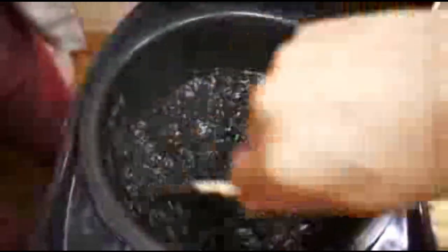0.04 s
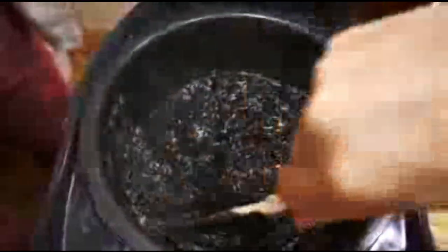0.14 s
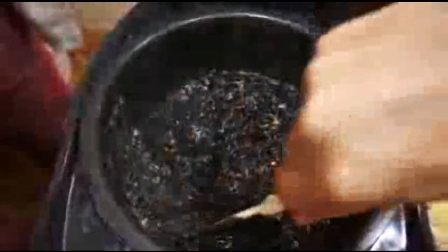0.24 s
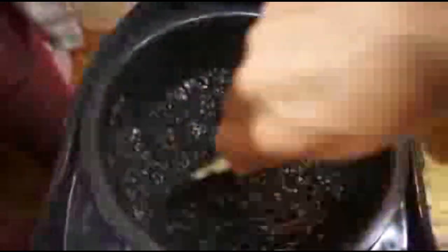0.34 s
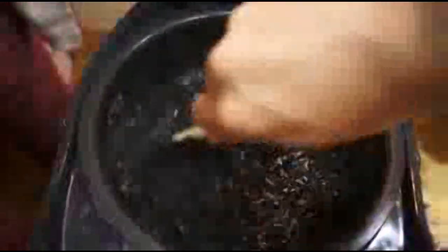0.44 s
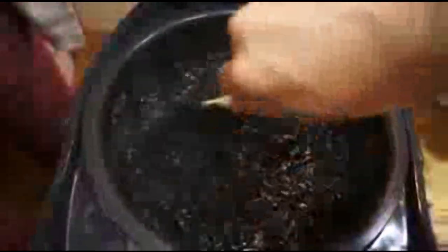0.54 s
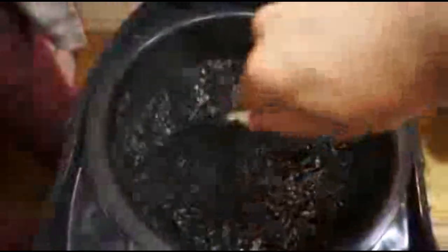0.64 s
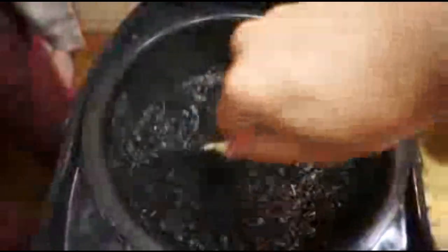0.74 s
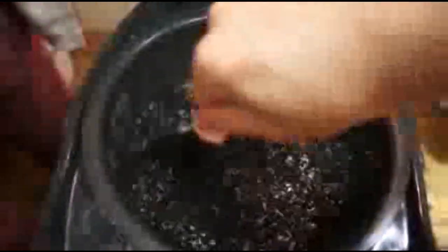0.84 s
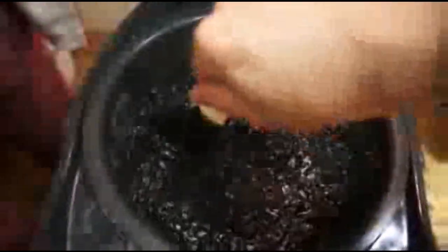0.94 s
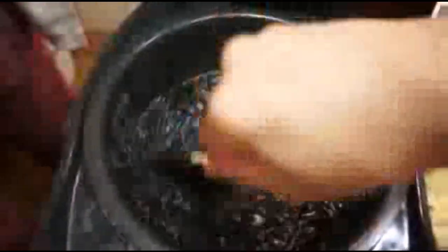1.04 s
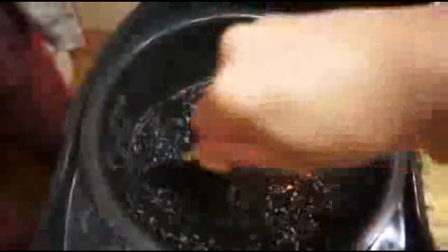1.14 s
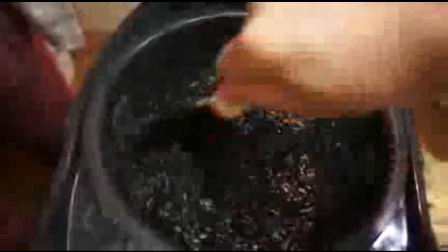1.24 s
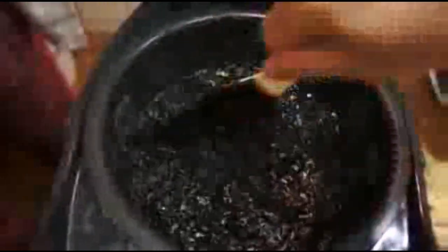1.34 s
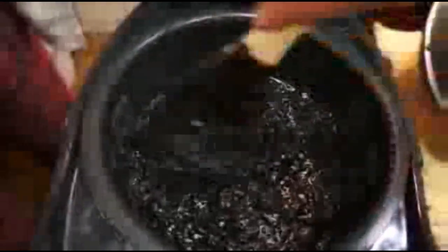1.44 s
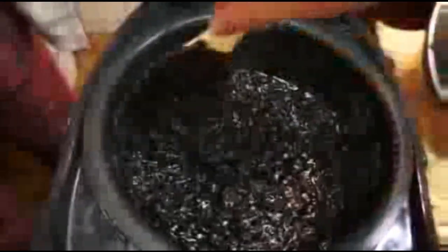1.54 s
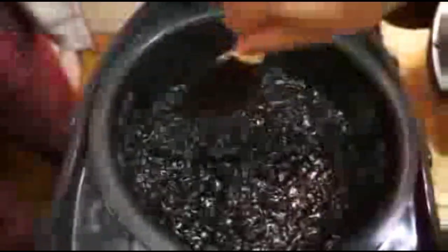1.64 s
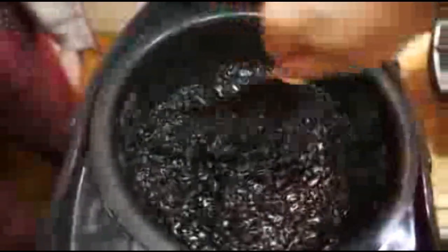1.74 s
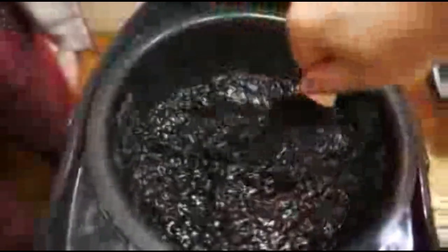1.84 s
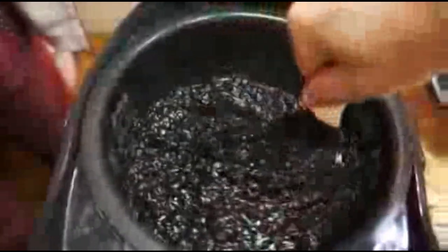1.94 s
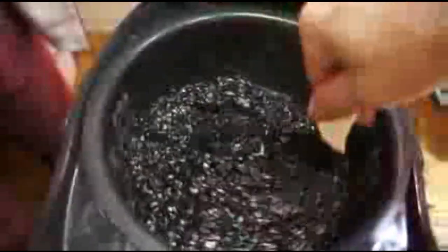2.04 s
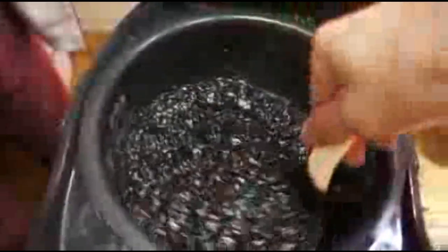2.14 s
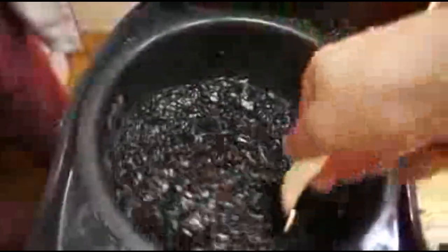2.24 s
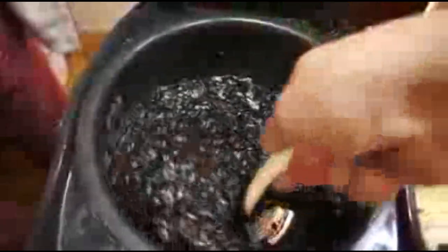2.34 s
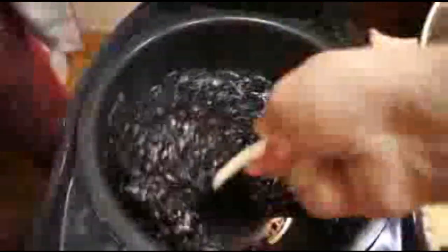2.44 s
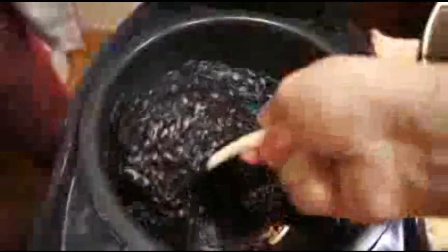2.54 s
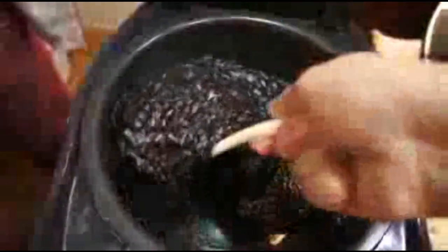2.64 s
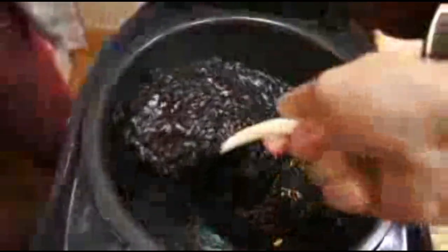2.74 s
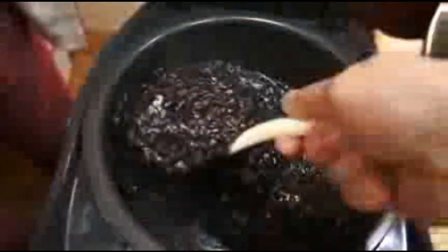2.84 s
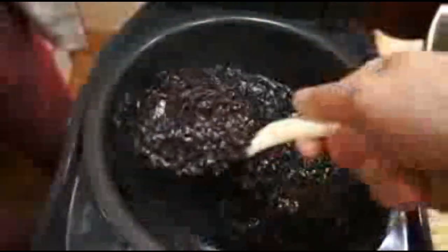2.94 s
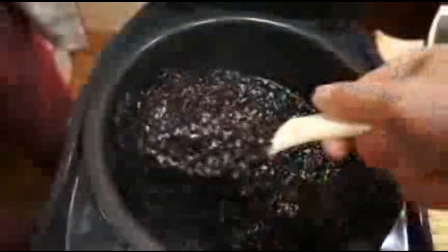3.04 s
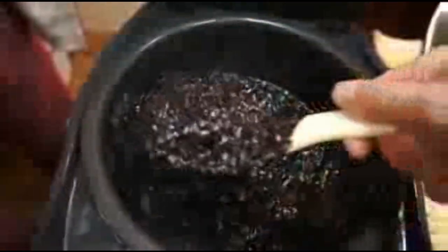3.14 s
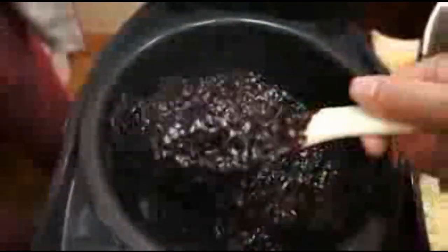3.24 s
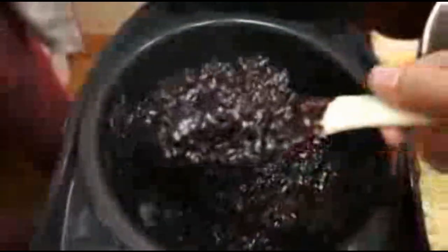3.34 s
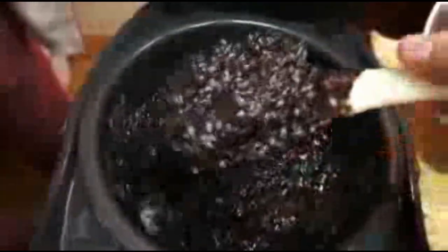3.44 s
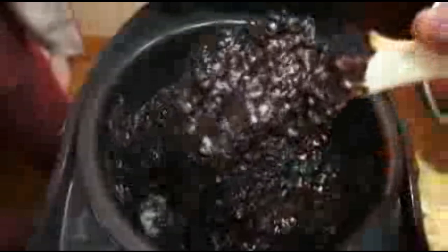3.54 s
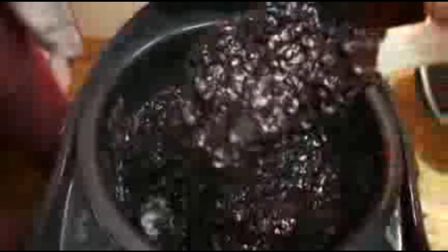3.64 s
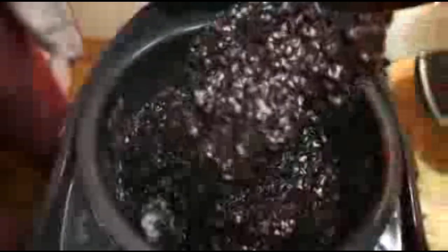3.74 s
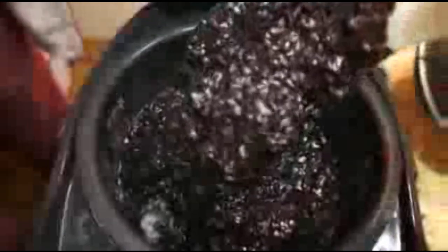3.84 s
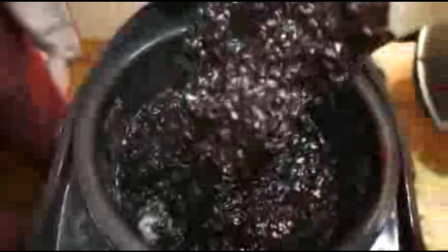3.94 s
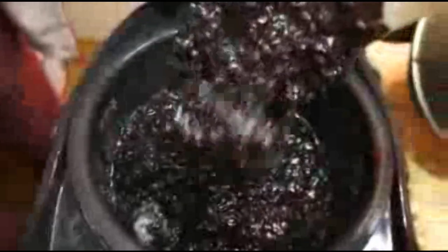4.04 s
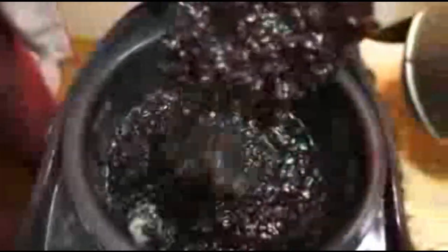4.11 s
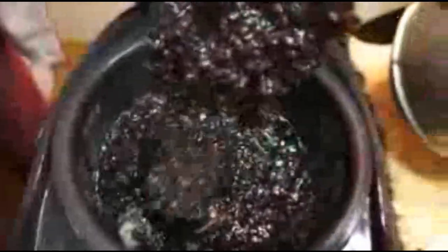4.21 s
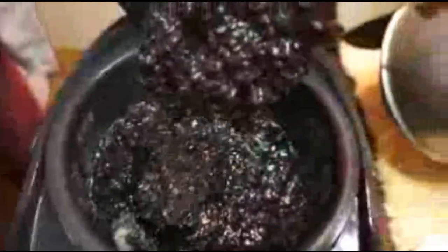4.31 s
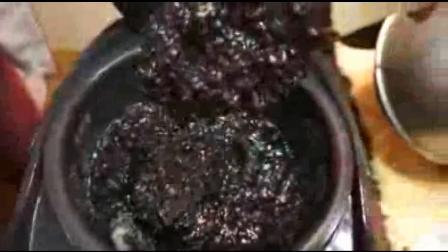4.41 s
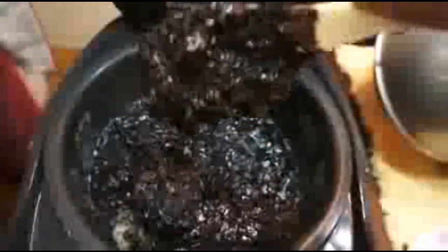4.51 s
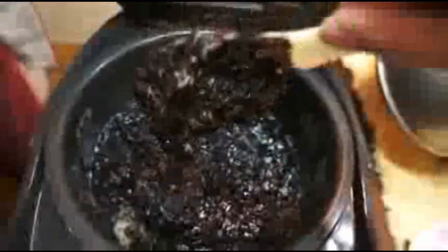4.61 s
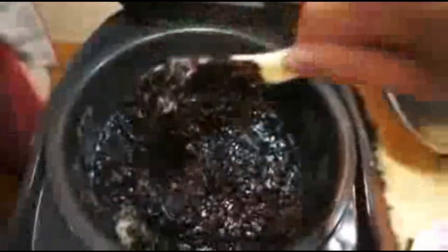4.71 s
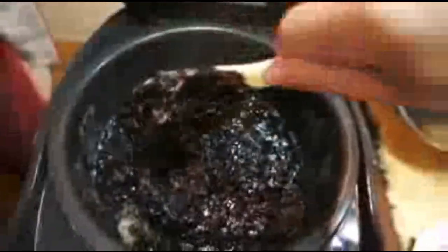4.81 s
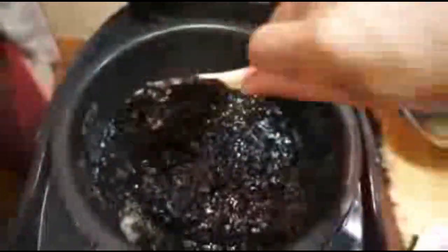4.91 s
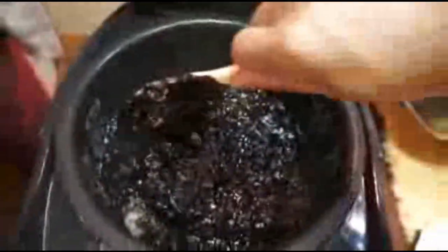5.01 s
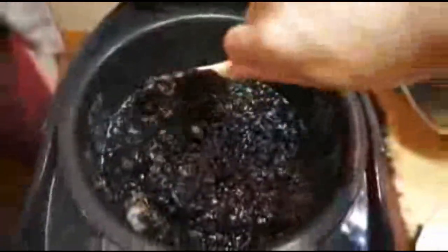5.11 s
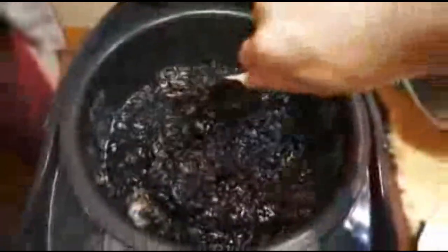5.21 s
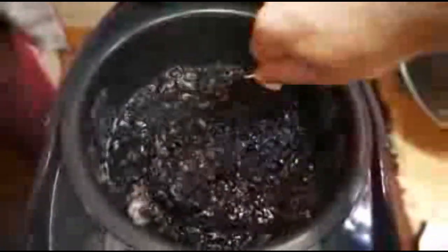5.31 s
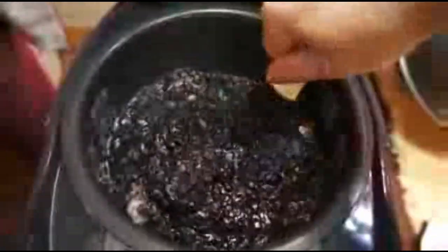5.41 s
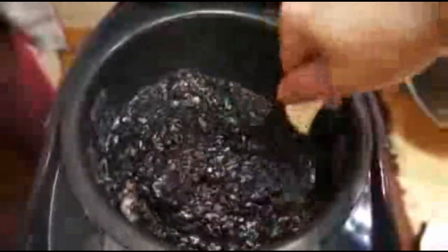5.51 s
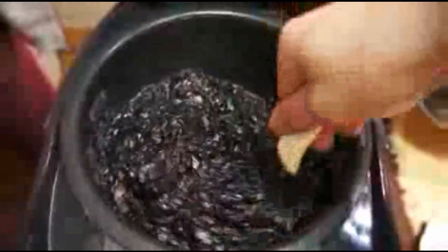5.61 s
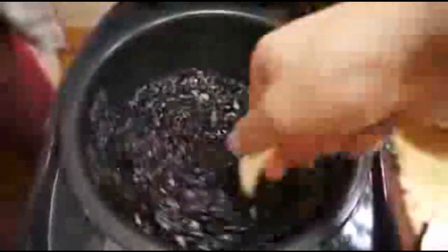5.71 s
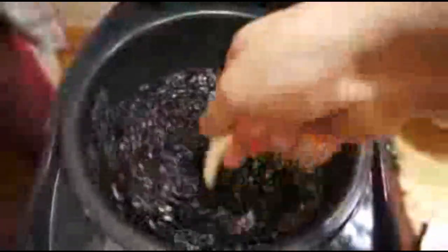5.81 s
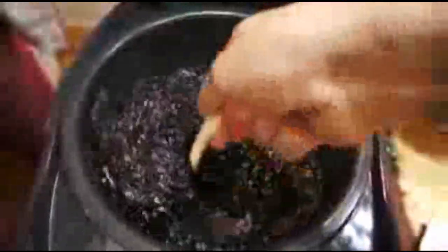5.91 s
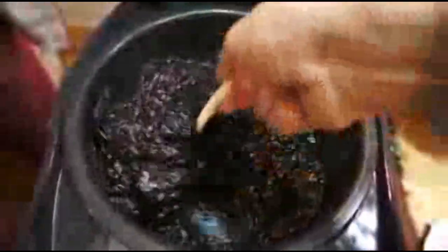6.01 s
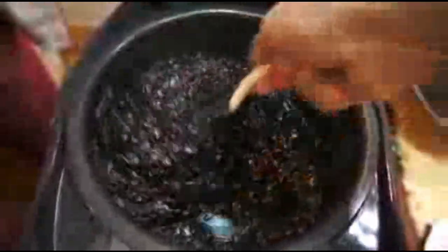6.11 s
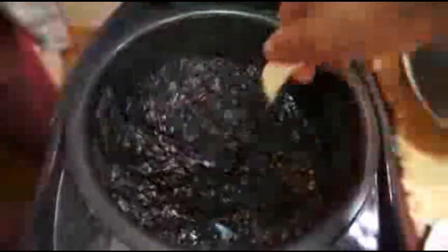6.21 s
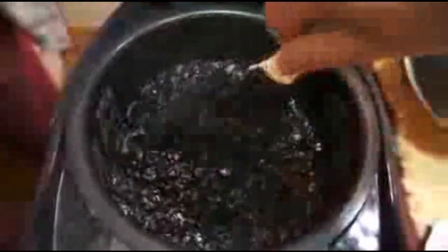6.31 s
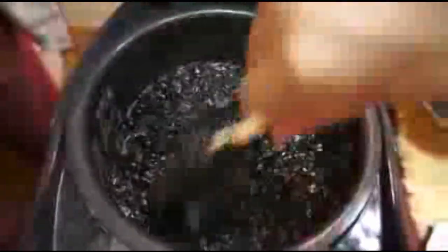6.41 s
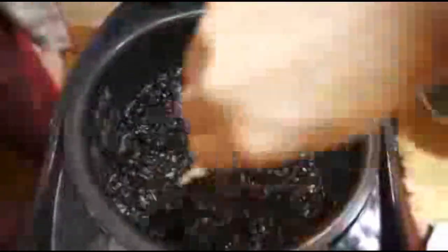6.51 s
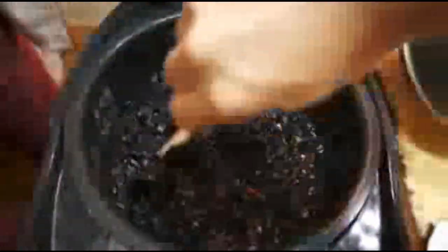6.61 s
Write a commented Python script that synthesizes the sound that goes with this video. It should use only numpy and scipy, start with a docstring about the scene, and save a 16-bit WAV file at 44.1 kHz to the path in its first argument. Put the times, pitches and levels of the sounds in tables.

```python
"""Sticky rice, paddle and pot

Kitchen, a small microphone close to a rice cooker; a plastic paddle turns sticky rice in its pot.
Knocks are brief pushes and crunches that ring blade and pot; rubs are uneven slips in one resonance.
Shaped noise bursts make the drag, the scraping and the wet crackle; snapping starch gives louder smacks.
Around the middle the pushes pause, leaving little but the room's hiss and a thin whine.
A small room's short reverberation follows the pot, and low shudders rock the cooker.
"""
import sys
import numpy as np
from scipy import signal
from scipy.fft import rfft, irfft, next_fast_len
from scipy.io import wavfile
from scipy.ndimage import uniform_filter1d, map_coordinates

SR = 44100
rng = np.random.default_rng(int(sys.argv[2]) if len(sys.argv) > 2 else 0)


def store_wav(level_fs):
    """Save 16-bit WAV to argv[1]."""
    pcm = np.round(np.clip(np.atleast_2d(level_fs), -1, 1) * 32767)
    wavfile.write(sys.argv[1], SR, pcm.T.astype(np.int16))


N = 293706

# Room hiss, relative colour: [f/Hz, level/dB]
HISS_COLOUR = [(25, -3.5), (70, -10.5), (160, -2.5), (350, -5.5), (620, -3.5), (1100, -9), (2500, -14.5),
               (5000, -17.5), (7500, -22), (15000, -13.5)]
HISS_DB = -65.5
# Pushes of the paddle through the rice, levels before the mix of layers:
# [start t/s, length/s, force level/dB, wetness/dB over force]
STROKES = [(-0.05, 0.055, -62.5, -0.5), (0.125, 0.09, -49, 0), (0.25, 0.16, -60, 3),
           (0.538, 0.13, -52, -2.5), (0.689, 0.07, -54.5, -5), (0.837, 0.071, -47.5, -12.5),
           (0.996, 0.077, -54.5, -4.5), (1.188, 0.033, -48.5, -21), (1.303, 0.23, -60.5, 3),
           (1.725, 0.22, -55.5, -4), (1.915, 0.13, -50, -14), (2.141, .2, -50.5, -10),
           (2.347, 0.24, -51.5, -13), (2.582, 0.34, -63.5, 6), (3.027, .42, -69, 2.5),
           (4.215, 0.17, -64.5, -2), (4.636, 0.043, -55.5, -9), (5.318, 0.048, -61.5, -1.5),
           (5.56, 0.2, -57.5, -0.5), (5.702, 0.21, -51.5, -3), (5.972, 0.26, -58.5, 0.5),
           (6.26, 0.071, -56, 1), (6.37, 0.16, -60, 0)]
STROKE_ATTACK_S = .035
DRAG_RELEASE_DB_PER_S, CRACKLE_RELEASE_DB_PER_S = 212, 146  # the grains go on parting after the blade stops
RESTING_DRAG_DB, RESTING_CRACKLE_DB = -70.5, -77.5  # rice settling between pushes, before the mix
# Rice dragged over the pot, relative colour: [f/Hz, level/dB]
DRAG_COLOUR = [(59, -25), (100, -14), (194, -9), (290, 4.5), (392, -2), (518, 5.5), (810, -2.5),
               (937, -2.5), (983, -6), (1430, -8), (1800, -44), (2340, -36), (3960, -120)]
# Edge of the paddle scraping, relative colour: [f/Hz, level/dB]
SCRAPE_COLOUR = [(600, -21), (1400, 4.5), (2200, -1.5), (3100, 3.5), (4200, -9), (6000, -23.5)]
# Wet grains parting, relative colour: [f/Hz, level/dB]
CRACKLE_COLOUR = [(2500, -35), (4200, -10), (5500, 3), (7200, 8.5), (15000, 2.5)]
# Paddle on pot: [t/s, contact time/s, blade note f/Hz, free ringing of the wall/dB, strength level/dB,
# brightness/dB per register, snap of crushed rice level/dB]
KNOCKS = [(0.1128, 0.0031, 2143, 2.5, -37, 7, -47), (0.362, 0.0019, 514, 0.5, -55.5, -4.5, -78),
          (0.43, 0.00073, 510, -0.5, -53, -5, -69), (0.4587, 0.00087, 543, -10, -41, -5, -51.5),
          (0.6108, 0.0021, 1525, -4, -46.5, 3.5, -38.5), (0.906, 0.002, 400, 1, -44.5, -2, -51.5),
          (0.989, 0.00072, 1417, -2.5, -37, 0, -59.5), (1.282, 0.00062, 761, -9, -40, -2, -58.5),
          (1.734, .0014, 1245, 1, -48, 8, -44.5), (1.911, .003, 1280, 0.5, -32.5, -6.5, -48.5),
          (2.179, 0.0012, 892, -2.5, -37, 2, -36.5), (2.298, .0016, 560, 4.5, -49, -4, -66),
          (2.563, 0.00078, 2180, -17, -55, 6, -72), (2.64, 0.0019, 1755, -3, -46.5, -0.5, -55),
          (5.405, .001, 1358, -2, -26.5, -6, -55), (5.441, 0.00058, 514, -4, -47.5, -7.5, -76),
          (5.776, 0.00098, 1650, 3, -48.5, 1, -78), (6.057, 0.0011, 1070, -6.5, -54.5, 0, -70),
          (6.2852, 0.0024, 2800, -1.5, -49.5, 0, -55), (6.617, 0.0037, 1530, -10, -45, 5, -39.5),
          (6.6261, 0.00095, 1134, 4, -32.5, 3.4, -39)]
# A blow of middling brightness, in its five registers: thump, thud, body, clack, ring [level/dB over strength]
KNOCK_REGISTERS_DB = [-26.5, -10, -1, -1, -12]
# Modes of the rice-filled pot, before each blow's detuning, scatter and damping: [f/Hz, level/dB, t60/s]
POT_MODES = [(155, -7, .04), (243, -1, .07), (302, -2, .07), (440, -6, .05), (515, 2, .08), (620, -11, .04),
             (760, -7, .04), (930, -5, .05), (1050, -7, .05), (1210, -5, .05), (1303, 2, .1),
             (1470, -5, .05), (1640, -15, .05), (1830, -11, .06), (2000, -6, .06), (2100, 0, .08),
             (2450, -10, .035), (2825, -6, .05), (3400, -14, .05), (5090, -8, .04), (6780, -11, .035),
             (7340, -7, .04)]
# Blade sticking and slipping on the wet wall: [t/s, length/s, pitch f/Hz, level/dB before the swell]
RUBS = [(0.133, 0.052, 1260, -51), (0.175, 0.11, 4740, -53), (0.281, 0.038, 335, -53),
        (0.859, 0.07, 508, -51), (1.204, 0.031, 470, -48.5), (1.824, 0.17, 3350, -51.5),
        (2.187, 0.072, 7300, -53.5), (2.297, 0.06, 830, -50.5), (2.412, 0.17, 2260, -59.5),
        (2.507, 0.03, 543, -49.5), (2.826, 0.098, 3400, -58), (5.762, 0.067, 1740, -64),
        (6.282, 0.055, 2780, -49), (6.283, 0.038, 720, -49)]
# Louder smacks of sticky rice letting go: [t/s, level/dB before the smack gain, pitch f/Hz]
SMACKS = [(0.192, -54.5, 3600), (0.622, -46.5, 5340), (0.662, -57, 1100), (0.922, -53, 1900),
          (1.164, -59.5, 1700), (1.096, -55.5, 6900), (1.232, -54.5, 7140), (1.275, -53.5, 6000),
          (1.517, -58, 2270), (1.75, -53.5, 2600), (2.309, -57.5, 4350), (2.582, -54.5, 2920),
          (2.619, -54.5, 5430), (2.667, -53, 7500), (2.722, -58, 2100), (2.75, -55.5, 2980),
          (2.781, -55.5, 7500), (2.906, -60.5, 4800), (3.059, -58, 7100), (3.319, -58, 4700),
          (4.176, -64.5, 2500), (4.308, -52.5, 6650), (4.32, -58, 2540), (4.349, -53, 8150),
          (4.365, -58, 8200), (4.656, -57.5, 3680), (5.027, -63, 2680), (5.328, -57.5, 4300),
          (5.463, -49, 1700), (5.554, -54, 7100), (5.65, -43.5, 3320), (5.758, -55, 7640),
          (5.808, -49.5, 1320), (6.13, -57.5, 1000), (6.229, -54, 2600)]
SMACK_FALL_DB, SMACK_BODY_DB = 12, -20  # one octave off pitch (grows with the square); broad body
# Random small smacks: level over the wet crackle before size and gain, middle of a one-octave range
SMALL_SMACKS_PER_S, SMALL_SMACK_DB, SMALL_SMACK_HZ = 19, -5, 6000
# Cooker rocking on its feet: [t/s, level/dB before the swell]
ROCKS = [(0.466, -60.5), (1.93, -64), (2.658, -68.5)]
# Decay of the small kitchen: [f/Hz, t60/s]
KITCHEN_DECAY = [(100, 0.23), (250, 0.56), (550, 0.45), (1500, 0.44), (4000, 0.21), (8000, 0.2)]
# What the room gives back, relative: [f/Hz, level/dB]
WALLS = [(80, -13), (180, 5.5), (320, -6.5), (600, 2.5), (1500, -8.5), (3000, 0.5), (7000, 1)]
# Likeness of left and right: [f/Hz, likeness from 0 to 1]
LEFT_RIGHT_LIKENESS = [(100, .985), (300, .975), (600, .95), (1200, .93), (2500, .8), (4500, .45),
                       (7500, .15), (15000, .25)]
# Treble response of the recorder: [f/Hz, level/dB]
TREBLE = [(7950, 0), (8400, -30), (9700, -40), (11400, -22), (12600, -42), (13600, -36), (14300, -5),
          (15000, -11), (15600, -32)]
TOP_HZ = 16000


def amp(db):
    """Decibels to gain."""
    return 10 ** (np.asarray(db) / 20)


def unit(x):
    """x at rms 1."""
    return x / np.sqrt(np.mean(x ** 2) + 1e-20)


def along(points, hz):
    """(f/Hz, value) points read on a log frequency axis."""
    f, v = np.transpose(points)
    return np.interp(np.log(hz + 1), np.log(f + 1), v)


def wobble(rate):
    """A smooth random curve, rate knots a second."""
    knots = rng.standard_normal(int(N * rate / SR) + 4)
    return map_coordinates(knots, [np.arange(N) * rate / SR])


def filtered(x, response):
    """x times a response of frequency."""
    m = next_fast_len(N + 8192)
    return irfft(rfft(x, m) * response(np.fft.rfftfreq(m, 1 / SR)), m)[..., :N]


def add(track, s, sound):
    """Mix a sound into a track at time s."""
    start = round(s * SR)
    part = sound[..., :max(N - start, 0)]
    track[..., start:start + part.shape[-1]] += part


def bandpass(x, order, edges_hz):
    """Butterworth band of x between two edges."""
    return signal.sosfilt(signal.butter(order, edges_hz, "band", fs=SR, output="sos"), x)


def spread(pair):
    """Two unrelated sounds to left and right: alike in the bass, apart in the treble."""
    def mid_side(hz):
        turn = np.arccos(np.clip(along(LEFT_RIGHT_LIKENESS, hz), -1, 1)) / 2
        return np.array([np.cos(turn), 1j * np.sin(turn)])

    mid, side = filtered(pair, mid_side)
    return np.array([mid + side, mid - side])


def coloured(pair, spectrum):
    """Stereo sound of rms 1 with the given colour."""
    return unit(spread(filtered(pair, lambda hz: amp(along(spectrum, hz)))))


def voiced(pair, edges_hz, levels_db, lag_s):
    """A short sound with each register set to its level over 20 ms; lower registers arrive later."""
    out = 0
    for k, db in enumerate(levels_db):
        band = bandpass(pair, 4, edges_hz[k:k + 2])
        lag = round(abs(lag_s) * SR / (k + 1))  # the lowest takes all of lag_s
        late = np.pad(band, ((0, 0), (lag, 0)))[:, :pair.shape[1]]
        level = np.sqrt(np.sum(band ** 2, -1, keepdims=True) / (SR / 50))
        out = out + amp(db) * late / level
    return out


def background(whine_hz=7830, whine_width_hz=110, whine_db=-76):
    """Room hiss, its level barely wavering, with a thin high whine of narrow-band noise."""
    whine = filtered(rng.standard_normal((2, N)),
                     lambda hz: np.exp(-((hz - whine_hz) / whine_width_hz) ** 2))
    hiss = coloured(rng.standard_normal((2, N)), HISS_COLOUR)
    return amp(HISS_DB + 0.14 * wobble(11.0)) * hiss + amp(whine_db) * unit(whine)


def effort():
    """Gains of the drag and of the wet crackle: every push builds up, holds and dies away."""
    drag = np.full(N, amp(RESTING_DRAG_DB))
    crackle = np.full(N, amp(RESTING_CRACKLE_DB))
    for s, length, force_db, wet_db in STROKES:
        t = np.arange(N) / SR - s
        rise = np.clip(t / STROKE_ATTACK_S, 0, 1)
        after = np.maximum(t - length, 0)
        drag = np.maximum(drag, rise * amp(force_db - DRAG_RELEASE_DB_PER_S * after))
        crackle = np.maximum(crackle, rise * amp(force_db + wet_db - CRACKLE_RELEASE_DB_PER_S * after))
    return drag, crackle


def grains(rate, size_db, life_s, bed):
    """Tiny bursts of uneven size at random moments, on a bed of finer ones."""
    sizes = amp(size_db * np.minimum(rng.exponential(size=N), 3))
    bursts = sizes * (rng.random(N) < rate / SR)
    envelope = signal.lfilter([1], [1, -np.exp(-1 / (life_s * SR))], bursts)
    return (unit(envelope) + bed) * rng.standard_normal((2, N))


def hollows(pair, depth_db):
    """Pockets between the grains open and close, each briefly favouring its own pitch."""
    z = signal.stft(pair, nperseg=256)[2]
    field = rng.standard_normal(z.shape[1:])
    for axis in (0, 1):  # smooth over pitch, then over time
        field = uniform_filter1d(field, size=4, axis=axis)
    return signal.istft(z * amp(depth_db * unit(field)), nperseg=256)[1][:, :N]


def stirring(drag, crackle, drag_db=-3.0, scrape_db=-7, crackle_db=2.0, clump_db=1.8):
    """The paddle drags rice over the pot, its edge scrapes, and wet grains pull apart in clumps."""
    scrape = np.sqrt(drag * crackle)  # the edge needs both force and wetness
    heavy = grains(rate=160, size_db=4.5, life_s=0.0077, bed=0.34)
    wet = hollows(grains(rate=300, size_db=4.5, life_s=.002, bed=.7), depth_db=4)
    out = amp(drag_db) * drag * coloured(heavy, DRAG_COLOUR)
    out += amp(scrape_db) * scrape * coloured(wet, SCRAPE_COLOUR)
    out += amp(crackle_db) * crackle * coloured(wet, CRACKLE_COLOUR)
    return amp(clump_db * wobble(45)) * out


def knocks(push_db=20, crunch_db=16, blade_db=6, blade_t60=0.043, rattle_db=4, rattle_t60=0.11, lag_s=0.0012):
    """Each blow is a brief push and a crunch of trapped rice; then the blade and the pot's modes ring."""
    edges_hz = [65, 200, 390, 700, 1700, 3500, 15000]
    out, t = np.zeros((2, N)), np.arange(SR // 4) / SR
    hz, db, t60 = np.transpose(POT_MODES)
    for s, contact_s, note_hz, free_db, strength_db, bright_db, snap_db in KNOCKS:
        # the blade loads the wall at another place each time, which detunes it slightly
        pitch = hz * (1 + .007 * rng.standard_normal(len(hz)))
        ring_s = t60[:, None] * amp(free_db / 2)  # rice on the wall shortens its ring
        modes = np.cos(2 * np.pi * pitch[:, None] * t) * amp(-60 * t / ring_s)
        strengths = amp(db + 2 * rng.standard_normal((2, len(hz))))
        # the low modes start together, the high ones swing either way
        strengths = strengths * np.where(hz < 700, 1, rng.choice([-1, 1], strengths.shape))
        # the blade's own note depends on how deep it sits in the rice
        blade = np.sin(2 * np.pi * note_hz * t) * amp(blade_db - 60 * t / blade_t60)
        crunch, rattle = rng.standard_normal((2, 2, len(t)))
        ring = amp(free_db) * strengths @ modes + blade + amp(rattle_db - 60 * t / rattle_t60) * rattle
        u = t / max(contact_s, 5e-4)
        blow = ring * (1 - np.exp(-u)) + amp(crunch_db) * crunch * u * np.exp(1 - u)
        # the soft push mostly moves the low registers; it goes to the middle of the stereo image
        blow[0] += amp(push_db) * np.exp(-np.abs(t - contact_s) / .00015)
        # a blow cushioned by rice leans to the bass, one on the bare wall to the treble
        tilt = bright_db * (np.arange(len(KNOCK_REGISTERS_DB)) - 2)
        levels = strength_db + np.array(KNOCK_REGISTERS_DB) + tilt
        add(out, s, voiced(blow, edges_hz, [*levels, snap_db], lag_s))
    return spread(out)


def rubs(slip_rate=260, slip_t60=0.023, width=.13):
    """Uneven slips excite one broad resonance of the blade, swelling and fading."""
    out = np.zeros((2, N))
    for s, length, hz, db in RUBS:
        t = np.arange(int(length * SR)) / SR
        starts = rng.random(len(t)) < slip_rate / SR
        slips = signal.lfilter([1], [1, -amp(-60 / slip_t60 / SR)], starts) + 0.15
        noise = slips * rng.standard_normal((2, len(t)))
        tone = bandpass(noise, 2, [hz / (1 + width), hz * (1 + width)])
        add(out, s, amp(db) * unit(tone) * np.sin(np.pi * t / length))
    return spread(out)


def smacks(crackle, snap_s=0.0018, tail_db=-19, gain_db=1):
    """A starch film stretches and snaps, smaller threads follow; random small smacks track the crackle."""
    edges_hz, centres_hz = [500, 1800, 4500, 15000], np.array([950, 2850, 6700])
    out, t = np.zeros((2, N)), np.arange(SR // 10) / SR
    threads = amp(-60 * t / .07)
    envelope = t / snap_s * np.exp(1 - t / snap_s) + amp(tail_db) * threads
    small = []
    for when, size, octave in rng.random((int(SMALL_SMACKS_PER_S * N / SR), 3)):
        level_db = 20 * np.log10(crackle[int(when * N)] * (.5 + size)) + SMALL_SMACK_DB
        small.append((when * N / SR, level_db, SMALL_SMACK_HZ * 2 ** (octave - .5)))
    for s, db, hz in list(SMACKS) + small:
        off_pitch_db = -SMACK_FALL_DB * np.log2(centres_hz / hz) ** 2
        levels = db + gain_db + np.maximum(off_pitch_db, SMACK_BODY_DB)
        snap = envelope * rng.standard_normal((2, len(t)))
        add(out, s, voiced(snap, edges_hz, levels, lag_s=0))
    return spread(out)


def rocking(low_hz=28, high_hz=65, swell_s=0.033):
    """A soft low shudder of the cooker, band-passed noise that swells and settles."""
    out, t = np.zeros((2, N)), np.arange(SR // 3) / SR
    for s, db in ROCKS:
        shudder = bandpass(rng.standard_normal(len(t)), 2, [low_hz, high_hz])
        add(out, s, amp(db) * unit(shudder) * t / swell_s * np.exp(1 - t / swell_s))
    return out


def kitchen(x):
    """Reverberation of a small room, each frequency dying at its own speed."""
    hz, t, z = signal.stft(rng.standard_normal((2, SR // 2)), SR, nperseg=256)
    decay_db = along(WALLS, hz)[:, None] - 60 * t / along(KITCHEN_DECAY, hz)[:, None]
    tail = signal.istft(z * amp(decay_db), SR, nperseg=256)[1]
    tail = tail * (1 - np.exp(-np.arange(tail.shape[1]) / SR / 0.0012))  # soft onset
    tail = tail / np.linalg.norm(tail[0])
    return spread(signal.fftconvolve(x.mean(0)[None], tail, axes=1)[:, :N])


def scene(room_db=-12):
    """The pot and its reverberation sit a little to the right, their treble more so; hiss lies around."""
    drag, crackle = effort()
    pot = stirring(drag, crackle) + knocks() + rubs() + smacks(crackle) + rocking()
    lean = [(150, .2), (500, .65), (2000, .75), (7000, 1.5)]  # f/Hz, level/dB up on the right, down on the left
    placed = filtered(pot + amp(room_db) * kitchen(pot),
                      lambda hz: amp(np.outer([-1, 1], along(lean, hz))))
    return placed + background()


def record(dry):
    """The recorder passes little above 8 kHz but a thin band of sizzle, and nothing from TOP_HZ up."""
    return filtered(dry, lambda hz: amp(along(TREBLE, hz)) * (hz < TOP_HZ))


dry = scene()
out = record(dry)
store_wav(out)
```